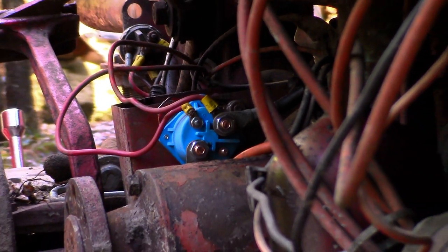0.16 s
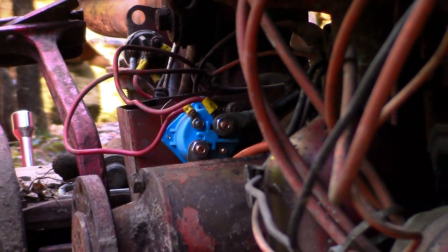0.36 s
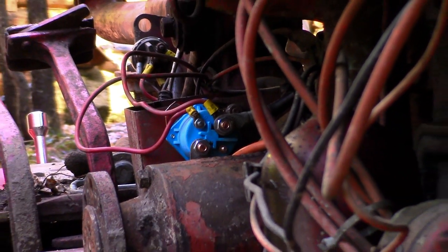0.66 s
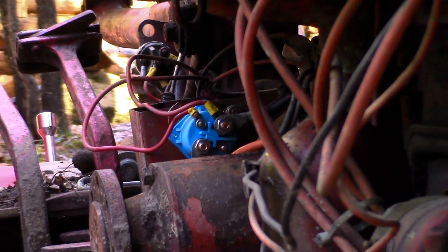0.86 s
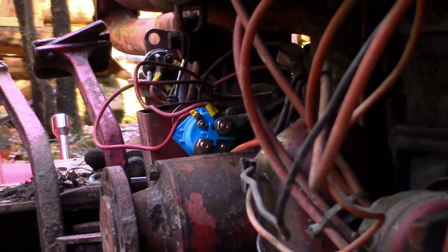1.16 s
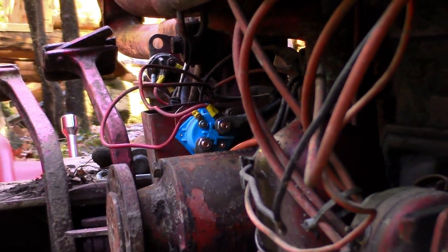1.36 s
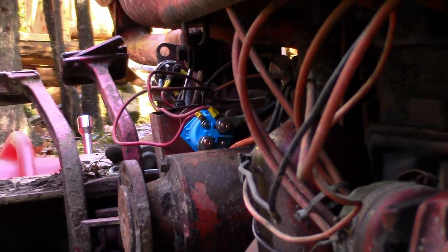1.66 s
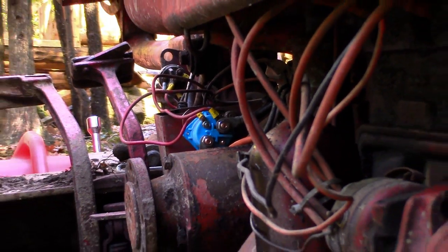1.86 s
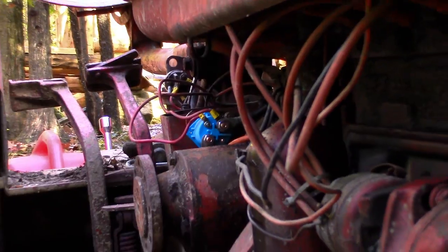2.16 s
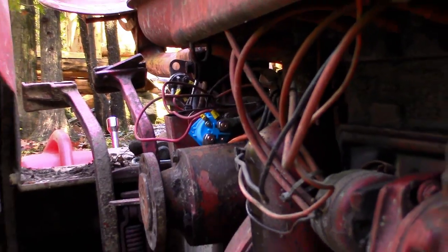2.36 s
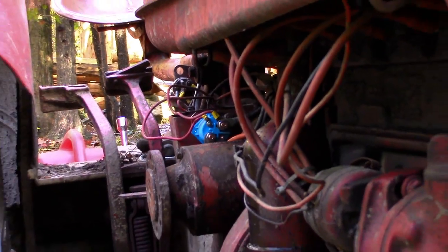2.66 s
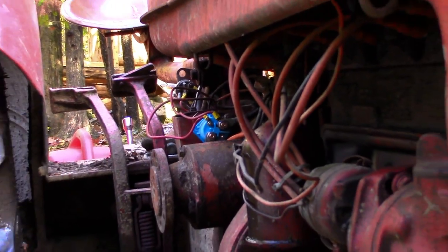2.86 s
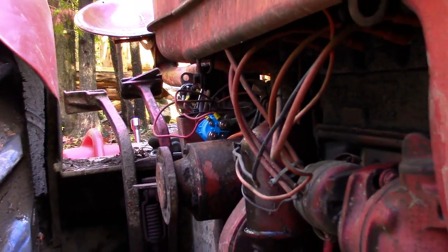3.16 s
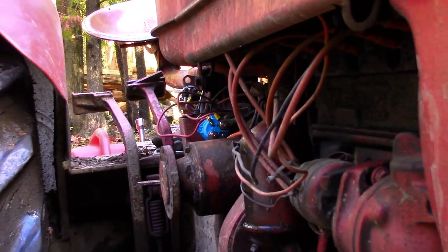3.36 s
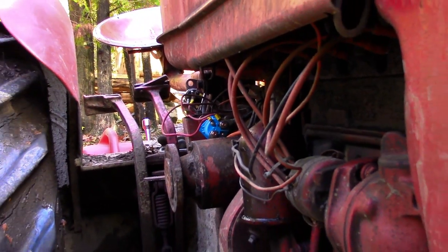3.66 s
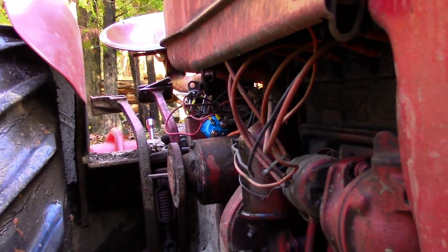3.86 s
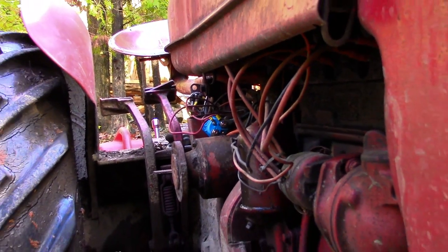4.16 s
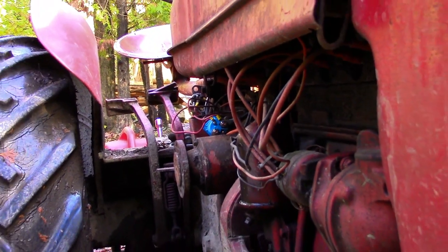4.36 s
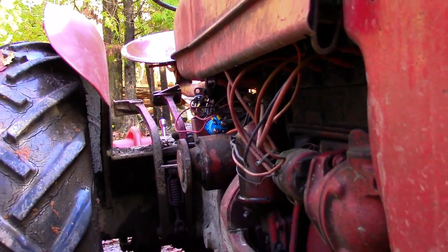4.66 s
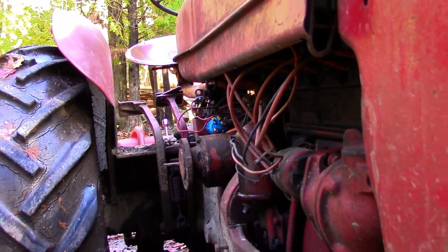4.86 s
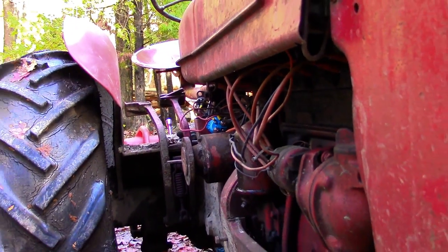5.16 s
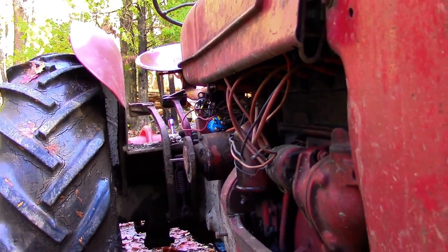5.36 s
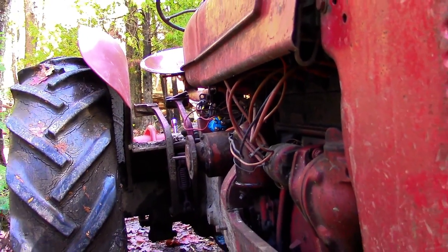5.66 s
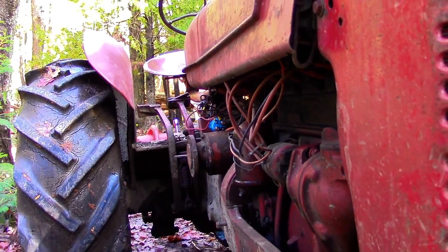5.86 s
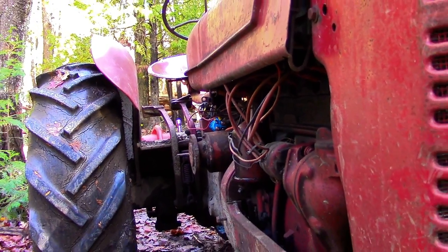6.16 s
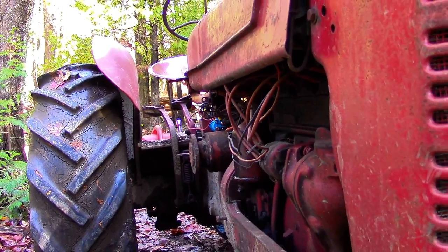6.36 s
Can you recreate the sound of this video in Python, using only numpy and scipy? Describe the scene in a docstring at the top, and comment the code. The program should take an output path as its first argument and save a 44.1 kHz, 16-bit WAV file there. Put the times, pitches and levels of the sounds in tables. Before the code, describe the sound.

Fingers fumble with loose metal terminals, thumping, rubbing and tinkling irregularly right at the microphone, in quiet woodland with a small bird chirping early on.

```python
"""Metal connectors and wires are handled right at the microphone, beside a parked tractor among trees.
Under faint, steady outdoor air, fingers rub and scrape: uneven stick-slip bursts of noise.
From the first moment knocks thump a hollow casing: filtered noise bursts over a decaying low tone.
Small terminals tinkle and loose metal parts soon clink, each a sum of decaying modes.
Further off, a small bird gives one chirp, a quick series and a late one, all arched whistles."""
import sys
import numpy as np
from scipy import signal
from scipy.fft import rfft, irfft
from scipy.io import wavfile
from scipy.ndimage import uniform_filter1d, minimum_filter1d

SR = 44100
rng = np.random.default_rng(int(sys.argv[2]) if len(sys.argv) > 2 else 0)


def dump(signal):
    """Clip the signal to [-1, 1] and save it as 16-bit WAV at the path in sys.argv[1]."""
    limited = np.clip(np.atleast_2d(signal).T, -1, 1)
    pcm = np.round(limited * 32767).astype(np.int16)
    wavfile.write(sys.argv[1], SR, pcm)


N = 286650

# Clear knocks on the casing, with levels before the trims of each range:
# start_s, force_db, thud_pitch_hz, hardness_db (treble over thud), t60_s (before each range's life factor)
KNOCK_ROWS = [(0.006, -33.5, 444, -27, 0.11), (0.121, -31, 350, -22, 0.43), (0.146, -23.5, 300, -13, 0.6),
              (0.254, -19, 353, -18.5, 0.058), (0.298, -18, 520, -19, 0.11), (0.325, -11, 553, -35, 0.068),
              (0.344, -15.5, 465, -32, 0.065), (0.374, -20.5, 332, -9, .13), (0.436, -19.5, 510, -32, 0.1),
              (0.472, -30.5, 393, -1, 0.093), (0.537, -17.5, 322, -6, 0.26), (0.566, -23, 477, -12, 0.2),
              (0.604, -17, 593, -7.5, 0.21), (0.633, -29, 606, 4.5, 0.25), (0.726, -12, 291, -21.5, 0.099),
              (0.773, -34, 333, -8, 0.058), (1.042, -23, 337, -37, 0.086), (1.065, -24, 386, -31, 0.21),
              (1.204, -14.5, 341, -14, 0.13), (1.307, -27, 312, -16, 0.086),
              (1.404, -26.5, 303, -37, 0.095), (1.471, -28.5, 317, -14.5, 0.36), (1.632, -26, 310, -9, 0.3),
              (1.657, -15, 415, -28.5, 0.27), (1.754, -15.5, 479, -14.5, 0.46),
              (1.782, -15.5, 370, -7, 0.45), (1.825, -26, 496, 0, 0.11), (1.889, -16.5, 460, -13, 0.25),
              (1.990, -6.5, 273, -27, 0.13), (2.031, -7.5, 449, -26.5, 0.28), (2.082, -14, 627, -28, 0.035),
              (2.114, -14, 342, -11, 0.093), (2.131, -11, 587, -10.5, 0.1), (2.172, -8, 480, -54, 0.14),
              (2.187, -31, 400, 7, .11), (2.227, -16.5, 336, -18, 0.075), (2.246, -13, 340, -30, 0.039),
              (2.341, -6, 504, -15.5, 0.15), (2.389, -14.5, 323, -12.5, 0.15),
              (2.502, -33, 417, -43, 0.094), (2.604, -36.5, 445, -22.5, 0.094),
              (2.662, -35, 300, -46, 0.04), (2.86, -11.5, 506, -21, 0.29),
              (2.912, -22.5, 425, -20.5, 0.054), (2.943, -26, 380, -10, 0.063),
              (3.079, -34, 448, -5.5, 0.0084), (3.162, -19, 387, -28, 0.078),
              (3.237, -19.5, 583, -26, 0.068), (3.363, -17, 468, -30.5, .09),
              (3.420, -25.5, 403, -31, 0.049), (3.439, -27.5, 382, -12, 0.045),
              (3.474, -10, 439, -21, 0.071), (3.523, -14, 460, -17.5, 0.042), (3.531, -10, 357, -37, 0.032),
              (3.547, -21, 357, -3.5, 0.26), (3.695, -8, 304, -32, 0.092), (3.758, -10.5, 343, -50, 0.11),
              (3.797, -14.5, 356, -35, 0.069), (3.816, -26.5, 350, -11, 0.075),
              (3.844, -11.5, 326, -30.5, 0.1), (4.015, -22.5, 335, -38, 0.16),
              (4.038, -23, 342, -36, 0.047), (4.106, -34, 473, -5.5, 0.19), (4.234, -23, 578, -35, 0.086),
              (4.343, -15, 427, -40.5, 0.015), (4.658, -19.5, 440, -21, 0.11),
              (4.715, -26.5, 607, -33.5, 0.099), (4.841, -22, 557, -36, 0.031),
              (4.912, -15, 373, -19, 0.17), (4.965, -19.5, 307, -39.5, 0.1), (4.998, -6.5, 331, -32, 0.049),
              (5.023, -23, 357, -15, 0.012), (5.086, -23.5, 323, -23.5, 0.14),
              (5.192, -26, 447, -24, 0.066), (5.309, -6.5, 470, -29, 0.037),
              (5.323, -6.5, 297, -22.5, 0.12), (5.364, -9, 388, -13, 0.15), (5.387, -3, 346, -31, 0.11),
              (5.418, -13, 329, -31, 0.069), (5.706, -24.5, 717, -21.5, 0.23),
              (5.817, -29, 473, -32, 0.048), (5.981, -29.5, 330, -12, 0.23), (6.138, -30, 345, -42, .056),
              (6.234, -32, 333, -21.5, 0.078)]


def amp(db):
    """Amplitude factor of a level in dB."""
    return 10 ** (np.asarray(db) / 20)


def unit(x):
    """Scales to an RMS of one."""
    return x / np.sqrt(np.mean(x ** 2) + 1e-20)


def unit_peak(x):
    """Scales to a peak of one."""
    return x / abs(x).max()


def read(points, hz):
    """Reads a curve of (Hz, value) points along a logarithmic frequency axis."""
    point_hz, value = np.transpose(points)
    return np.interp(np.log(hz + 1), np.log(point_hz + 1), value)


def add(mix, start_s, sound):
    """Lays a sound into the mix at its start time, cut off at the end."""
    part = mix[:, max(round(start_s * SR), 0):][:, :sound.shape[-1]]
    part += sound[..., :part.shape[1]]


def colour(x, gain):
    """Causal minimum-phase filter whose gain is a function of frequency."""
    size = 2048
    hz = abs(np.fft.fftfreq(size, 1 / SR))
    log_gain = np.log(np.maximum(gain(hz), 1e-6))
    spectrum = np.exp(np.conj(signal.hilbert(log_gain)))
    taps = np.fft.ifft(spectrum).real
    return signal.fftconvolve(x, taps[None], axes=1)[:, :x.shape[1]]


def ports(pair):
    """Two unrelated signals become a left and right port that are alike in the bass."""
    # Likeness of the two ports: frequency_hz, likeness (0-1)
    likeness = [(30, 0.6), (120, .997), (500, .998), (1500, 0.98), (4000, .88), (12000, 0.7)]
    hz = np.fft.rfftfreq(pair.shape[1], 1 / SR)
    same = np.clip(read(likeness, hz), 0, 1)
    mid, side = irfft(rfft(pair) * np.sqrt([1 + same, 1 - same]), pair.shape[1])
    return np.array([mid + side, mid - side])


def air(level_db=-52.5):
    """A faint even wash of open woodland: coloured noise at both ports."""
    # Colour of the still outdoor air: frequency_hz, relative_level_db
    air_colour = [(15, -86), (25, -12.5), (190, -2.5), (317, 2), (659, -9), (796, -9), (1100, -10),
                  (1610, -13.5), (3340, -16), (5140, -23.5), (5570, -19.5), (14000, -38.5), (16000, -41)]
    noise = ports(rng.standard_normal((2, N)))
    wash = colour(noise, lambda hz: amp(read(air_colour, hz)))
    return amp(level_db) * unit(wash)


def spot(x, ripple_db=4.5, spacing_hz=170):
    """Every point of contact has its own uneven set of short resonances, weaker below 1 kHz."""
    grid_hz = np.arange(0, SR / 2, spacing_hz)
    chance = np.clip(rng.standard_normal(len(grid_hz)), -2, 2)
    peaks_db = ripple_db * chance * np.minimum(grid_hz / 1000, 1)
    return colour(x, lambda hz: amp(np.interp(hz, grid_hz, peaks_db)))


def casing(x, band, order=6):
    """One of four ranges of the casing's response: thud, clack, tick or glint (0 to 3)."""
    # Colour of what passes through the casing: frequency_hz, relative_level_db
    casing_colour = [(24, -109), (40, -48.5), (155, -9.5), (237, -6), (345, 5), (965, -8), (1410, -8.5),
                     (2050, -12), (3060, -11.5), (4680, -21.5), (5440, -20), (8340, -37.5), (9690, -38.5),
                     (13800, -51.5), (16000, -55.5)]
    # Where thud, clack, tick and glint meet: edge_hz
    crossovers_hz = [900, 3600, 8000]

    def gain(hz):
        below = [0] + [1 / (1 + (hz / edge) ** order) for edge in crossovers_hz] + [1]
        share = abs(below[band + 1] - below[band])
        return amp(read(casing_colour, hz)) * np.sqrt(share)
    return colour(x, gain)


def range_levels(db, hardness_db):
    """Thud, clack, tick and glint level of a contact: the harder it is, the further up it reaches."""
    clack_share, glint_share = 0.54, 0.9  # part of the hardness that reaches these ranges
    return [db + share * hardness_db for share in (0, clack_share, 1, glint_share)]


def rub_levels():
    """Rubbing dB in four ranges: strokes swell, hold and die away; a scuff surrounds each clear knock."""
    # Strokes of the fingers along wire and casing, levels before the wavering pressure:
    # start_s, length_s (until release), level_db, hardness_db (treble over low)
    stroke_rows = [(0.162, 0.18, -26.5, -8), (0.398, 0.15, -32.5, -13), (0.484, 0.22, -31.5, -5),
                   (1.171, 0.13, -32.5, -8), (1.65, 0.28, -31, -3.5), (1.96, .30, -32.5, -6),
                   (2.348, 0.084, -50, -26), (2.771, 0.091, -42, -1), (2.86, 0.057, -30.5, -30),
                   (3.221, 0.092, -51, 0), (3.397, 0.18, -29.5, -22), (3.626, 0.13, -35.5, -6.5),
                   (3.871, .44, -42.5, -15), (4.668, 0.28, -53, -8), (4.884, .09, -56, 8),
                   (4.953, 0.17, -40, -25), (5.376, 0.14, -44, -8.5), (5.937, 0.07, -38, -14.5),
                   (6.05, 0.55, -48.5, -22), (6.411, 0.24, -39, -3)]
    attack_s, release_db_per_s = 0.027, 209.5
    resting_db, resting_hardness_db = -78, 8  # the hands never lie quite still
    scuff_s, scuff_db = 0.0054, -14.5  # reach to either side of the knock, level relative to its force
    waver_db, waver_s = 2.5, 0.075  # RMS and time constant of the finger pressure

    t = np.arange(0, N, 64) / SR
    power = amp(range_levels(resting_db, resting_hardness_db))[:, None] ** 2
    for start_s, length_s, db, hardness_db in stroke_rows:
        swell = np.clip((t - start_s) / attack_s, 0, 1)
        release = amp(-release_db_per_s * np.maximum(t - start_s - length_s, 0))
        stroke = np.outer(amp(range_levels(db, hardness_db)), swell * release)
        power = power + stroke ** 2
    for start_s, force_db, _, hardness_db, _ in KNOCK_ROWS:
        brush = np.maximum(1 - abs(t - start_s) / scuff_s, 0)
        scuff = np.outer(amp(range_levels(force_db + scuff_db, hardness_db)), brush)
        power = power + scuff ** 2
    chance = rng.standard_normal(len(t))
    waver = signal.lfilter([1], [1, -np.exp(-t[1] / waver_s)], chance)
    pressure_db = waver_db * unit(waver)
    return [np.interp(np.arange(N) / SR, t, 10 * np.log10(row) + pressure_db) for row in power]


def rubbing(glint_db=-7, slip_s=0.00063, smooth=0.75, spots=6, slips_per_s=350, moves_per_s=35):
    """Skin and wire stick and slip in tiny uneven bursts, while the contact wanders from spot to spot."""
    slip_size = amp(3 * np.minimum(rng.exponential(1, N), 3))
    slips = slip_size * (rng.random(N) < slips_per_s / SR)
    bursts = signal.lfilter([1], [1, -np.exp(-1 / (slip_s * SR))], slips)
    grip = smooth + unit(bursts)
    friction = ports(grip * rng.standard_normal((2, N)))
    moves = np.cumsum(rng.random(N) < moves_per_s / SR)
    touched = rng.integers(0, spots, N)[moves]
    shake = sum(spot(friction * (touched == k)) for k in range(spots))
    low, scrape, hiss, glint = rub_levels()
    levels = [low, scrape, hiss, glint + glint_db]
    return sum(amp(db) * unit(casing(shake, band)) for band, db in enumerate(levels))


def boom(t, hz, t60, rise_s=0.0025):
    """One low mode of the casing: a sine that rises fast and dies away."""
    return np.sin(2 * np.pi * hz * t) * amp(-60 * t / t60) * (1 - np.exp(-t / rise_s))


def at_level(x, db):
    """Scales a blow so that its energy, spread over 12 ms, has this level."""
    return amp(db) * x / np.sqrt(np.sum(x ** 2) / (2 * .012 * SR))


def nudges(count=58):
    """Small chance knocks whose force and hardness follow the strokes; rows like the clear knocks."""
    # level and hardness are relative to those of the rubbing; each spread scales a chance draw
    level_db, level_spread_db = 7.5, 2
    centre_hz, spread_octaves, t60 = 382.5, 0.44, 0.04
    harder_db, hardness_spread_db = -10.5, 4

    low, _, hiss, _ = rub_levels()
    at = ((np.arange(count) + rng.random(count)) * N / count).astype(int)
    force, place, edge = np.clip(rng.standard_normal((count, 3)), -2, 2).T
    force_db = low[at] + level_db + level_spread_db * force
    pitch_hz = centre_hz * 2 ** (spread_octaves * place)
    hardness_db = hiss[at] - low[at] + harder_db + hardness_spread_db * edge
    return list(zip(at / SR, force_db, pitch_hz, hardness_db, np.full(count, t60)))


def knocks(thud_db=-5, clack_db=-1, tick_db=-1.5, glint_db=-3, tone=0.94, tone_t60=0.064,
           clack_life=0.64, tick_life=0.12, glint_life=0.42, snap=4, rise_s=0.00014,
           tail_db=-29, tail_t60=0.7, count=3):
    """A blow starts a crowd of short vibrations and chatters; the casing booms at each blow's pitch."""
    # Deep bumps of the whole casing: start_s, peak_db, pitch_hz, t60_s
    bump_rows = [(0.728, -23, 160.4, 0.059), (3.164, -31, 158, 0.17), (3.477, -20, 162, 0.095),
                 (5.398, -28, 179, 0.24)]
    rebound_s, rebound_db = .009, 8.5  # mean gap between re-contacts; size over the first, before decay

    out, t = np.zeros((2, N)), np.arange(8192) / SR
    close = np.minimum(1, 2 * (1 - t / t[-1]))  # fades out over the second half
    for start_s, force_db, hz, hardness_db, t60 in KNOCK_ROWS + nudges():
        thud, clack, tick, glint = range_levels(force_db, hardness_db)
        ranges = [(thud + thud_db, 1), (clack + clack_db, clack_life),
                  (tick + tick_db, tick_life), (glint + glint_db, glint_life)]
        gaps = rng.random(count) * 2 * rebound_s * SR
        rebounds = np.minimum(np.cumsum(gaps), len(t) - 1).astype(int)
        for band, (db, life) in enumerate(ranges):
            # each range dies at its own rate, over a weak longer tail
            fade = amp(-60 * t / max(t60 * life, .004)) + amp(tail_db - 60 * t / tail_t60)
            shake = rng.standard_normal((2, len(t))) * fade * (1 - np.exp(-t / rise_s))
            shake[0, 0] += snap  # the first contact
            shake[0, rebounds] += snap * amp(rebound_db - 60 * t[rebounds] / t60)
            blow = unit(casing(spot(ports(shake)), band))
            if band == 0:
                blow = blow + tone * unit(boom(t, hz, tone_t60))
            add(out, start_s, at_level(blow, db) * close)
    for start_s, peak_db, hz, t60 in bump_rows:
        add(out, start_s, amp(peak_db) * unit_peak(boom(t, hz, t60)))
    return out


def strike(part, favoured_hz, ring, pitch=1, favour_db=8, rise_s=0.00027, turn=0.28):
    """A metal part rings in its own modes, cut short when fingers or neighbours touch it."""
    # Modes of the five loose metal parts, by part and before the pitch and ring factors:
    # frequency_hz, relative_level_db, t60_s
    part_modes = { "ring": [(2143, -20, .3), (3203, -14, .2), (3919, -9, .12), (4382, -10, .12),
                  (5266, 0, .26), (7014, 0, .26), (8570, -16, .15), (9329, -9, .15), (10422, -10, .2),
                  (13894, -17, .2)], "hook": [(3195, -2, .45), (4270, -16, .5), (6985, 0, .4),
                  (7020, -6, .3), (8554, -17, .3), (10420, -7, .35), (14310, -19, .3), (14900, -8, .18)],
                  "tag": [(2681, -14, .15), (4420, -9, .3), (6595, -13, .2), (9935, 0, .13),
                  (12200, -14, .12), (15176, -6, .2)], "lug": [(4124, -18, .22), (4425, -7, .25),
                  (4452, -13, .15), (6105, -20, .3), (6595, 0, .22), (6625, -8, .17), (8210, -24, .26),
                  (8640, -26, .3), (9157, -24, .26), (9960, -16, .18), (10540, -24, .16), (11260, -22, .21),
                  (11832, -25, .46), (12310, -28, .33), (12902, -28, .32), (13260, -24, .48),
                  (15180, -23, .16)], "clip": [(2474, -1, .2), (3128, -8, .12), (3768, -14, .15),
                  (4118, -1, .17), (5589, -9, .12), (5672, -7, .16), (5835, -7, .13), (6181, 0, .15),
                  (6358, -11, .2), (8900, -16, .1), (9367, -14, .13), (9690, -13, .12), (11246, -19, .14),
                  (12400, -21, .14)]}
    focus_db, focus_octaves = 13, 0.014  # a favoured pitch right on one mode brings that mode out

    ring = np.clip(ring, .05, 2)
    t = np.arange(round(.55 * ring * SR)) / SR
    mode_hz, mode_db, t60 = np.transpose(part_modes[part])[:, :, None]
    hz = mode_hz * pitch
    chance_db, lag, phase = rng.standard_normal((len(hz), 3)).T[:, :, None]
    octaves = abs(np.log2(hz / favoured_hz))
    focus = focus_db * np.exp(-(octaves / focus_octaves) ** 2)
    weight_db = mode_db - favour_db * octaves + focus
    fade = amp(weight_db - weight_db.max() + chance_db - 60 * t / (t60 * ring))
    # every mode reaches the two ports with its own phase
    angle = 2 * np.pi * (hz * t + phase)
    pair = [(fade * np.sin(angle + side * turn * lag)).sum(0) for side in (1, -1)]
    return np.array(pair) * (1 - np.exp(-t / rise_s))


def jingle(count=18, touches_per_s=80, rubbed_db=-3, knocked_db=-7, ring=0.48):
    """Small terminals of assorted sizes tinkle with the rubbing, and each clear knock jolts one."""
    out, hiss = np.zeros((2, N)), rub_levels()[2]
    start_s, force_db, _, hardness_db, _ = np.transpose(KNOCK_ROWS)
    tick = force_db + hardness_db
    jolted = rng.integers(0, count, len(start_s))
    for k in range(count):
        mine = jolted == k
        touches = (rng.random(N) < touches_per_s / count / SR) * amp(hiss + rubbed_db)
        touches[np.round(start_s[mine] * SR).astype(int)] += amp(tick[mine] + knocked_db)
        pitch, favoured_hz = rng.uniform(.65, 1.2), rng.uniform(2500, 8000)
        terminal = strike(["clip", "ring"][k % 2], favoured_hz, ring, pitch)
        out += signal.oaconvolve(touches[None], terminal, axes=1)[:, :N]
    return out


def clinks():
    """Loose parts hit each other, each clink favouring the modes near its point of contact."""
    # Single clinks: start_s, part, relative_level_db, favoured_hz (by the point of contact),
    # ring (factor on the part's ring time, held between 0.05 and 2)
    clink_rows = [(0.151, "hook", -36, 11000, 1.6), (0.148, "hook", -38.5, 4270, 2.2),
                  (0.197, "tag", -21, 8000, 1.04), (0.298, "hook", -16.5, 3000, 0.047),
                  (0.354, "lug", -24.5, 5270, 0.21), (0.473, "ring", -31, 5000, 0.23),
                  (0.539, "ring", -45, 3800, 0.85), (0.568, "ring", -31.5, 4200, 2.5),
                  (0.603, "clip", -34, 3970, 1.8), (0.623, "ring", -25, 9200, 0.53),
                  (0.671, "ring", -35, 5000, 2.2), (0.772, "ring", -42, 6160, 0.74),
                  (1.192, "clip", -35.5, 7800, 0.77), (1.851, "clip", -21.5, 6650, 0.32),
                  (1.89, "clip", -25.5, 5640, .95), (2.045, "clip", -26, 4900, 2),
                  (2.098, "lug", -23, 6740, 0.57), (2.123, "clip", -23, 3250, 1.4),
                  (2.168, "clip", -22, 6600, 0.96), (2.191, "clip", -24.5, 9310, 0.48),
                  (2.345, "lug", -2.5, 5800, 0.65), (2.392, "lug", -8, 5900, 0.76),
                  (2.864, "lug", -37, 4400, 0.44), (3.24, "lug", -48.5, 4500, 1.1),
                  (3.552, "lug", -41, 4425, 2), (3.634, "tag", -40.5, 4420, .9),
                  (3.686, "clip", -40, 5840, 2.3), (4.056, "lug", -46.5, 9157, 0.8),
                  (5.192, "hook", -59, 6050, 0.48), (5.355, "hook", -27, 14100, 0.33),
                  (5.36, "hook", 0.5, 7480, 0.11), (5.365, "hook", -9.5, 3195, 0.15),
                  (5.373, "hook", -37.5, 4840, 1), (5.974, "clip", -34, 6000, .44)]
    out = np.zeros((2, N))
    for start_s, part, db, favoured_hz, ring in clink_rows:
        add(out, start_s, amp(db) * strike(part, favoured_hz, ring))
    return out


def bird(upper_db=-7):
    """Each chirp is a quick, slightly hoarse arch of pitch, with a weaker second whistle above it."""
    # Chirps, levels before the bird's setting in the scene:
    # start_s, level_db, top_pitch_hz (before the waver), length_s
    chirp_rows = [(0.439, -44, 7750, 0.045), (0.804, -44, 6660, 0.028), (0.889, -43.5, 6740, 0.027),
                  (0.965, -45.5, 6800, 0.042), (1.043, -45, 6760, 0.049), (5.51, -47, 6500, 0.016)]
    out = np.zeros((2, N))
    for start_s, db, top_hz, length_s in chirp_rows:
        u = np.linspace(-1, 1, round(length_s * SR))
        waver = unit(uniform_filter1d(rng.standard_normal(SR), size=25))[:len(u)]
        pitch_hz = top_hz * (1 - .42 * u ** 2 + .03 * waver)
        phase = 2 * np.pi * np.cumsum(pitch_hz) / SR
        swell = np.sqrt(1 - u ** 2) * (1 - .5 * u)  # loudest on the way up
        whistles = np.sin(phase) + amp(upper_db) * np.sin(1.17 * phase)
        add(out, start_s, amp(db) * swell * whistles)
    return out


def scatter(x, t60):
    """Diffuse echoes: a decaying noise tail, different at each port."""
    t = np.arange(SR) / SR
    tail = rng.standard_normal((2, SR)) * amp(-60 * t / t60) * (1 - np.exp(-t / 0.006))
    return signal.fftconvolve(x, tail / np.linalg.norm(tail[0]), axes=1)[:, :N]


def scene(near_echo_db=-27, bird_db=-4):
    """Close handling, almost dry, and the bird further off among the trees."""
    hands = knocks() + rubbing() + clinks() + jingle()
    chirps = bird()
    near = hands + amp(near_echo_db) * scatter(hands, t60=0.32)
    far = chirps + amp(-3) * scatter(chirps, t60=.35)
    return near + amp(bird_db) * far + air()


def record(dry, ceiling=0.5, low_cut_hz=62, edge_hz=15750):
    """Microphone with unequal ports, a low cut, a fast peak limiter shared by both ports, then the band limit."""
    # Left port over right: frequency_hz, difference_db
    balance = [(60, 0), (380, 0.3), (1290, 0.6), (2380, 1.3), (4400, 2.8), (8120, 2.5), (15000, -2.5)]
    tilt_db = read(balance, np.fft.rfftfreq(N, 1 / SR))
    x = irfft(rfft(dry) * amp([tilt_db / 2, -tilt_db / 2]), N)
    x = signal.sosfilt(signal.butter(2, low_cut_hz, "high", fs=SR, output="sos"), x)
    # both ports share the gain that the louder one allows, smoothed over 120 samples
    allowed = np.minimum(1, ceiling / (abs(x).max(0) + 1e-9))
    x = x * uniform_filter1d(minimum_filter1d(allowed, size=120), size=120)
    band_limit = signal.firwin(255, edge_hz, window=("kaiser", 9), fs=SR)
    return signal.oaconvolve(x, band_limit[None], "same")


dry = scene()
out = record(dry)
dump(out)
```